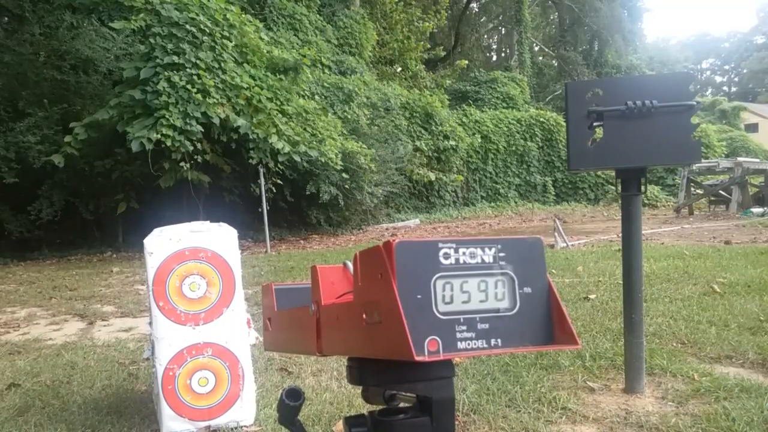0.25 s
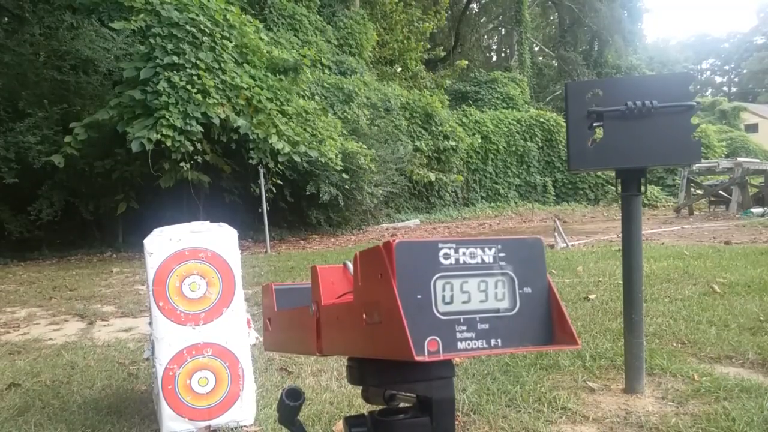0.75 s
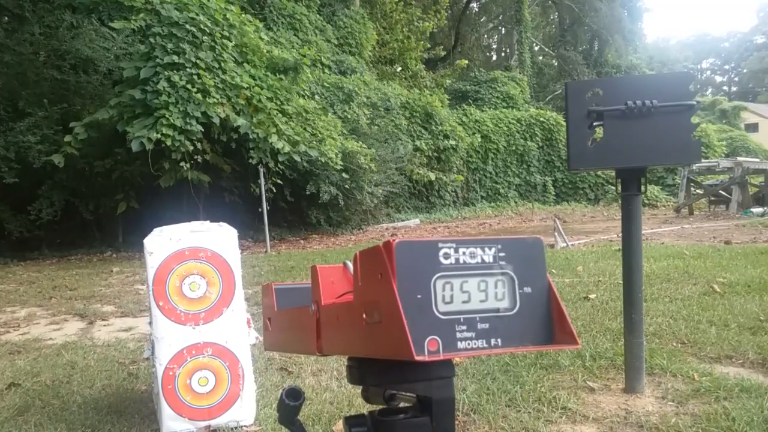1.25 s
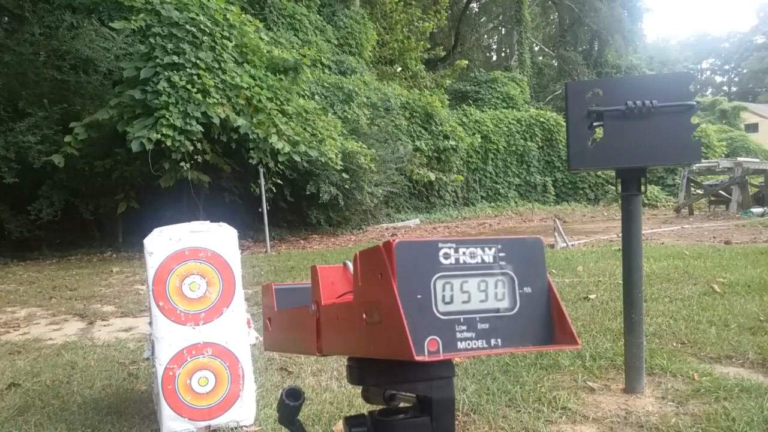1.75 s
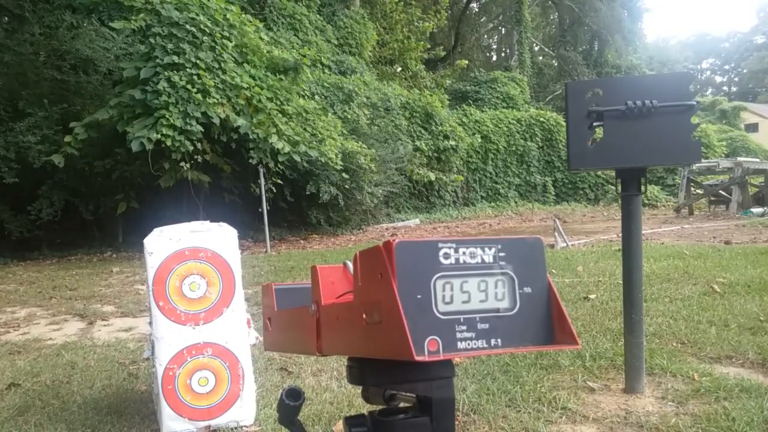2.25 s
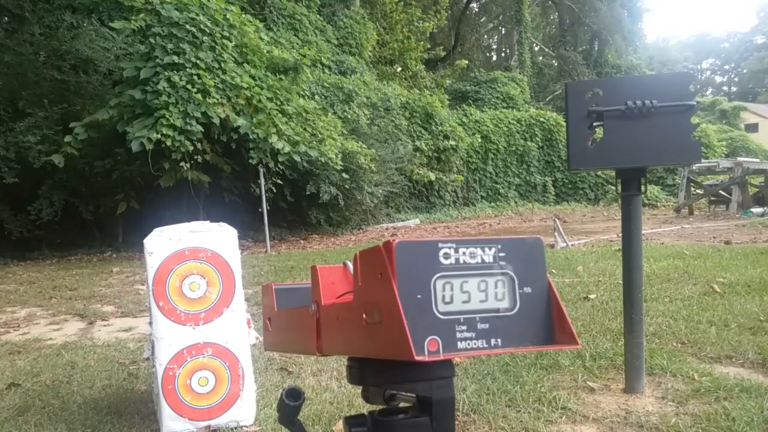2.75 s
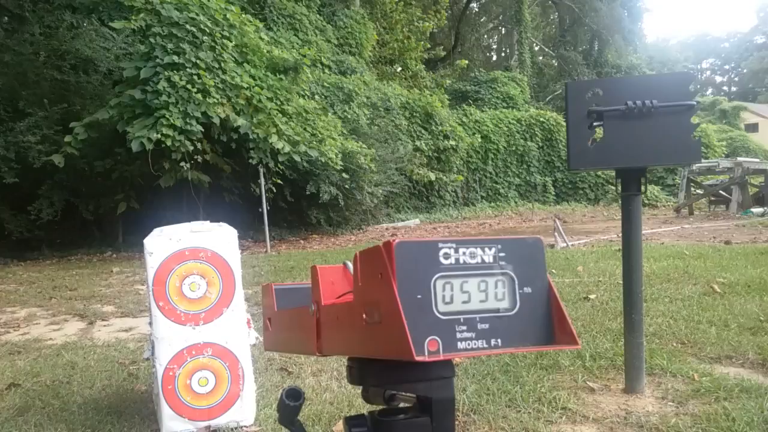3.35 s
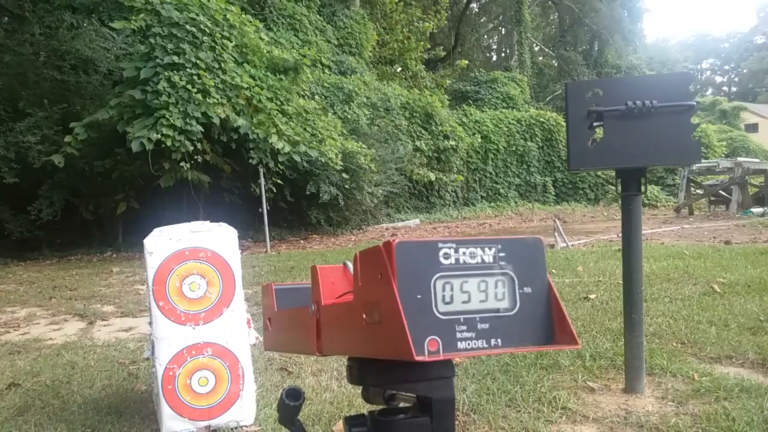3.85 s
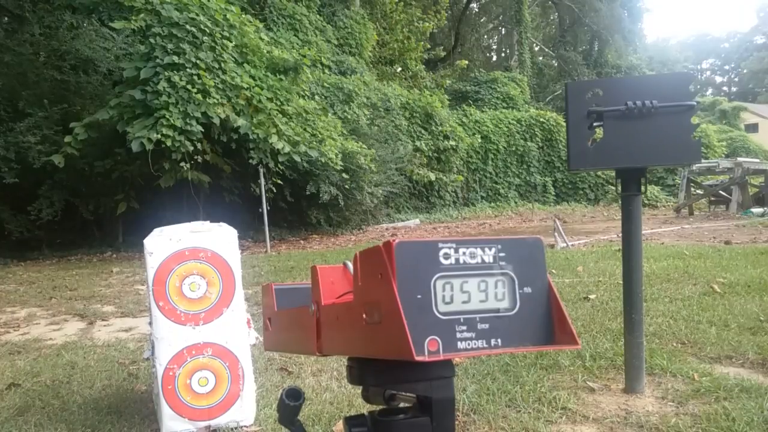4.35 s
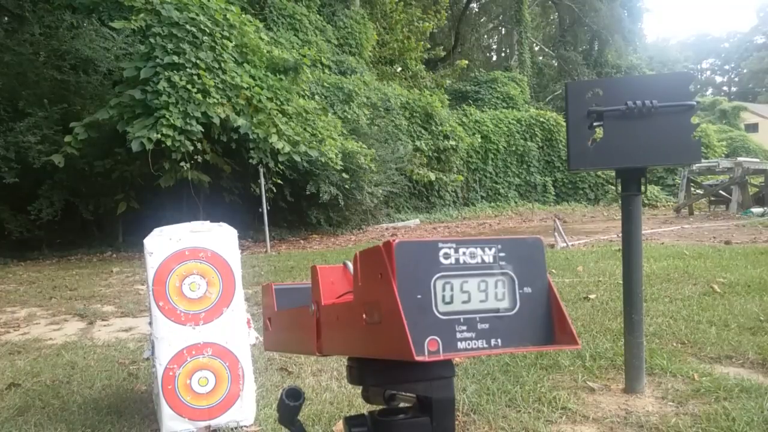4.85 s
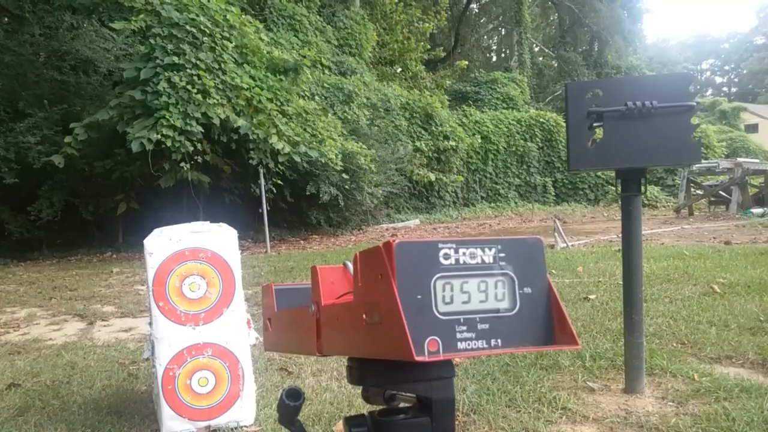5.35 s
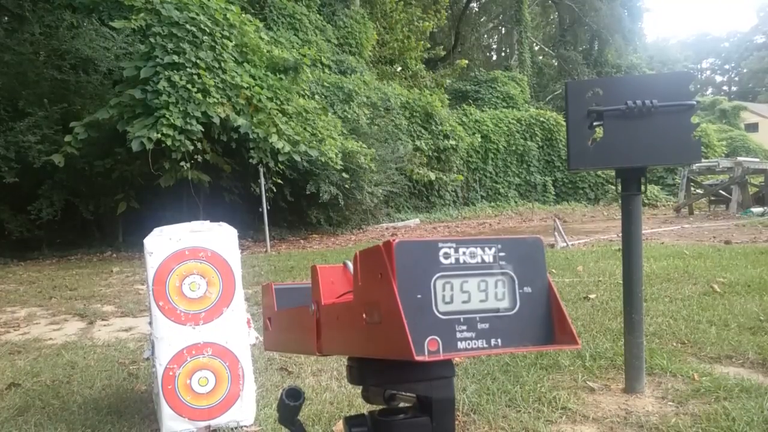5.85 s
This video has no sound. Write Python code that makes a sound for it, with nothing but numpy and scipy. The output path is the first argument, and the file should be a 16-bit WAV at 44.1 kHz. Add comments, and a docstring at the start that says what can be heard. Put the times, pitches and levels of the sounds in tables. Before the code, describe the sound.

Six loud, dry mechanical clacks about a second apart, each followed by small latch and stop clicks, with outdoor rumble and faint insect trill.

```python
"""An air pistol is pumped close by in a garden. The opening arm clicks faintly against its open stop; closing,
it rasps, judders in quick slips and slams shut, then its latch lets go and it opens again, over and over.
Each blow is a burst of tiny impacts ringing the pistol's modes; fences and trees echo it.
About halfway a far bird gives brief whistles, two slightly falling and two arched in pitch. Throughout: a motor
hum of wavering harmonics, distant traffic and leaves of swelling noise, a trilling insect of noise chirps."""
import sys
import numpy as np
from scipy import signal
from scipy.fft import rfft, irfft, next_fast_len
from scipy.io import wavfile
from scipy.ndimage import uniform_filter1d

SR = 44100
rng = np.random.default_rng(int(sys.argv[2]) if len(sys.argv) > 2 else 0)


def volts(x):
    """Linear amplitude factor 10**(x/20) for a level x in dB, scalar or array-like."""
    e = np.asarray(x, float) / 20
    return 10 ** e


def unload_wav(signal):
    """Save mono or channel-first audio to the path in sys.argv[1] as 16-bit WAV at rate SR, clipped to [-1, 1]."""
    wavfile.write(
        sys.argv[1],
        SR,
        np.round(np.clip(np.atleast_2d(signal).T, -1, 1) * 32767).astype(np.int16),
    )


N = 268562  # samples


def level(x, db):
    """Scale to an rms level."""
    return x * volts(db) / np.sqrt(np.mean(x ** 2))


def colour(x, table):
    """Filter by (hz, gain_db) points, interpolated over log frequency."""
    size = next_fast_len(len(x))
    hz, db = np.transpose(table)
    gain = volts(np.interp(np.log(np.fft.rfftfreq(size, 1 / SR) + 1), np.log(hz), db))
    return irfft(rfft(x, size) * gain, size)[:len(x)]


def band(x, hz, width_hz):
    """Second-order band-pass."""
    return signal.lfilter(*signal.iirpeak(hz, hz / width_hz, fs=SR), x)


def walk(rate_hz):
    """Random levels held 1 / rate_hz and slewed twice; spread near 1."""
    hold = int(SR / rate_hz)
    steps = np.repeat(rng.standard_normal(N // hold + 1), hold)
    return 1.3 * uniform_filter1d(uniform_filter1d(steps, hold), hold)[:N]


def add(out, time_s, sound):
    """Mix a sound in at a time."""
    i = int(time_s * SR)
    out[i:i + len(sound)] += sound[:N - i]


def pistol():
    """The pump arm closes in rasps, slips and slams, and opens in clicks."""
    return slams() + judders() + rasps() + opening()


# arm slams shut: time_s, contact_ms, level_db (2 to 5.5 kHz), body_db (400 Hz to 2 kHz), thump_db (under 400 Hz)
SLAM_BLOWS = [(.549, 1.8, -17.5, -17.5, -44.5), (0.5504, 3.1, -9, -13, -37), (1.4814, 3.8, -9.5, -12, -27),
              (2.5246, 4.2, -6.5, -8, -36.5), (3.4815, 4.47, -9, -10, -33.5), (4.461, 5, -9, -12.5, -30.5),
              (5.719, 4.5, -4.5, -8, -35.5)]


def slams():
    """Slams build up over their contact."""
    out = np.zeros(N)
    for time_s, contact_ms, level_db, body_db, thump_db in SLAM_BLOWS:
        band_db = (thump_db, body_db, level_db, level_db - 4)
        sound = blow(column=0, contact_ms=contact_ms, band_db=band_db,
                     rise=1.6, grain_depth=5.5, scatter_db=1.2, detune=0.006)
        add(out, time_s, sound)
    return out


# closing arm sticks and slips: bite_s, bite_db, run_end_ms (after the bite), run_db, slip_gap_ms
JUDDER_RUNS = [(0.49, -21, 0, -20, 5), (0.5028, -23, 39, -18.5, 5.6), (1.443, -21.5, 29.5, -22.5, 4.7),
               (2.487, -20, 31, -26, 4), (3.4476, -20.5, 32, -26.5, 5), (4.428, -20, 28, -27.5, 4.5),
               (5.6999, -16.5, 10, -32, 5)]
# slip spectrum: relative_db under 400 Hz, to 2 kHz, to 5.5 kHz, above
SLIP_BAND_DB = (-21, 0, -4, -8.5)
# change from slip to slip: step_db in the same four bands
SLIP_STEP_DB = np.array([-.6, -.6, -1.4, -1.6])


def judders():
    """The arm bites, pauses, then slips on in a quick fading run; each slip starts abruptly."""
    pause_ms, jitter_ms, scatter_db = 8.5, 0.5, 1.5
    out = np.zeros(N)
    for bite_s, bite_db, run_end_ms, run_db, slip_gap_ms in JUDDER_RUNS:
        k = np.arange(7)
        time_chance, level_chance = rng.standard_normal((2, 7))
        times_s = bite_s + (pause_ms + slip_gap_ms * k + jitter_ms * time_chance) / 1000
        run_levels = run_db + np.outer(k, SLIP_STEP_DB) + scatter_db * level_chance[:, None]
        bite_levels = bite_db + np.array([0, 0, -2, -2])  # duller than the first slip of the run
        for time_s, levels in zip((bite_s, *times_s), (bite_levels, *run_levels)):
            if time_s > bite_s + run_end_ms / 1000:
                continue
            slip = blow(column=1, contact_ms=1.4, band_db=levels + np.array(SLIP_BAND_DB),
                        rise=0.46, grain_depth=6.5, scatter_db=1.5, detune=0.023)
            add(out, time_s - 0.0005, slip)
    return out


# arm rasps along the tube: time_s, contact_ms, level_db, treble_db (added above 2 kHz)
RASP_DRAGS = [(.516, 31, -26, 3.5), (.678, 36, -48, -4), (1.445, 36, -24.5, 0.5), (1.646, 30, -48, -3),
              (2.489, 26.3, -19.5, -3), (2.72, 21, -55, 4), (3.449, 33, -33.5, 6), (3.69, 21, -48, 1),
              (4.43, 28, -29.5, 2.5), (4.651, 37, -49, -2), (5.701, 21, -29, 5), (5.99, 34, -51.5, -6.5)]
# rasp spectrum: relative_db under 400 Hz, to 2 kHz, to 5.5 kHz, above
RASP_BAND_DB = (-31.5, 0, -7.5, -16.5)


def rasps():
    """The arm drags along the tube: long, rough contacts."""
    out = np.zeros(N)
    for time_s, contact_ms, level_db, treble_db in RASP_DRAGS:
        band_db = level_db + np.array(RASP_BAND_DB) + treble_db * np.array([0, 0, 1, 1])
        sound = blow(column=1, contact_ms=contact_ms, band_db=band_db,
                     rise=0.46, grain_depth=9, scatter_db=3.5, detune=0.017)
        add(out, time_s, sound)
    return out


# pivot, piston and grip: time_s, level_db (2 to 5.5 kHz), contact_ms, hardness_db, favoured_hz
SMALL_CLICKS = [(.027, -49, 3.9, 6, 3320), (.205, -36, 3.3, -3, 3600), (.227, -51, 1.7, 6, 2600),
                (.681, -42, 4, -4.5, 3630), (.935, -45, 2.4, 9, 4090), (1.017, -51, 2.9, -12, 1320),
                (1.061, -46, 1.4, 3, 3500), (1.193, -64, 3.5, -16, 1520), (1.939, -43, 1.1, 12, 3490),
                (2.002, -37, 4.1, 0.5, 3900), (2.075, -50.5, 2.4, 0, 4020), (2.742, -49, 4.8, -8, 1370),
                (2.982, -52, 2.3, 18, 2930), (3.064, -37, 5, 2, 2680), (3.316, -46.5, 1.7, 2.5, 3420),
                (3.7, -47, 6.8, -1, 1440), (3.86, -48.5, 4.8, -3, 2710), (3.931, -46, 5.6, 12.5, 4280),
                (4.02, -43.5, 2.8, 0.5, 2880), (4.678, -51, 4.7, -9, 1723), (4.787, -54, 5.9, 2, 2020),
                (4.846, -52, 5.1, -5, 2690), (5.012, -42.5, 1.2, -1.5, 3560), (5.256, -51.5, 2.6, -2, 3620),
                (6.02, -42.5, 7.2, -6, 2020), (6.025, -33, 5.8, 14, 5330), (6.076, -27, 1.7, 1, 3760)]


def opening():
    """Latch and stop click in set patterns; pivot, piston and grip click as well."""
    out = np.zeros(N)
    for row in list(SMALL_CLICKS) + latches() + stops():
        start_s, sound = click(*row)
        if start_s < N / SR:
            add(out, start_s, sound)
    return out


# latch lets go: time_s, contact_ms, knock_db, snap_lag_ms, snap_db
LATCH_RELEASES = [(.729, 7.2, -30, 5, -21), (1.706, 3.6, -31.5, 6, -29), (2.77, 1.97, -30, 4.5, -25.5),
                  (3.726, 4.3, -32, 3.5, -30), (4.705, 3.5, -31, 7, -28.5), (6.046, 2.3, -31, 7, -32.5)]


def latches():
    """Click rows: the latch knocks, snaps and bounces once; two stray ticks follow as the arm swings."""
    rows = []
    for time_s, contact_ms, knock_db, snap_lag_ms, snap_db in LATCH_RELEASES:
        snap_s = time_s + snap_lag_ms / 1000
        rows.append((time_s, knock_db, contact_ms, -6, 1154))
        rows.append((snap_s, snap_db, 4.3, 2.12, 2080))
        rows.append((snap_s + 0.034, knock_db - 18, 4, -8, 1396))
        for delay, loudness in rng.random((2, 2)):
            rows.append((time_s + 0.45 * delay, -63 + 6 * loudness, 4, -3, 2700))
    return rows


# arm meets its open stop: time_s, contact_ms, level_db, take_up_lead_ms
STOP_HITS = [(.084, 1.7, -29, 22.6), (.894, 6.2, -35, 23), (1.884, 5.2, -37, 28), (2.934, 5, -30, 17),
             (3.88, 5.1, -30, 9), (4.871, 4, -31, 10.7)]


def stops():
    """Click rows: slack is taken up, the arm meets its open stop and bounces once."""
    rows = []
    for time_s, contact_ms, level_db, take_up_lead_ms in STOP_HITS:
        rows.append((time_s - take_up_lead_ms / 1000, level_db - 14, 3.2, -3.5, 2700))
        rows.append((time_s, level_db, contact_ms, 0, 2930))
        rows.append((time_s + 0.034, level_db - 23.5, 4, -8, 1396))
    return rows


def click(time_s, level_db, contact_ms, hardness_db, favoured_hz):
    """A small blow, with less body and more treble the harder it is; returns start_s and sound."""
    body_db = level_db - 4.5 - hardness_db
    treble_db = level_db - 12 + 0.54 * hardness_db
    sound = blow(column=2, contact_ms=contact_ms, band_db=(body_db - 14.5, body_db, level_db, treble_db),
                 rise=0.47, grain_depth=3.5, scatter_db=0, detune=0.054, favoured_hz=favoured_hz)
    return time_s - 0.0012, sound


# resonances of the pistol: pitch_hz, t60_ms
PISTOL_MODES = [(65, 70), (120, 50), (260, 30), (545, 22), (780, 9), (950, 12), (1080, 22), (1300, 12),
                (1510, 20), (1660, 12), (1950, 9), (2280, 70), (2380, 13), (2980, 10), (3335, 50),
                (3350, 8), (3750, 7), (4170, 9), (4600, 7), (5250, 6), (6150, 6), (7150, 5), (8250, 5),
                (9250, 5), (10600, 4), (12300, 3), (13800, 3), (15000, 3)]
# relative strength of each mode: slam_db, slip_db, click_db
MODE_ANSWER = [(-9, -14, -10), (1, -9, -8.5), (3, 2.5, 9.5), (-4.5, -21, -13.5), (-10.5, -13, -14),
               (-3, -11, -7), (-26.5, -2.5, -9), (-8, -6.5, -7.5), (-4, 0.5, -4), (-3, 1, -6), (-9, -7, -5),
               (-20, -22, -19), (-10, -9, 0), (-8, -11, -2), (-12, -20, -14), (-5, -10, -3), (-6, -10, -4),
               (0, -9, -6), (-5, -11, -8), (-9, -11, -9), (-14, -11.5, -7), (-12, -14, -13.5),
               (-13, -17, -9.5), (-11.5, -12, -18), (-14.5, -20, -17.5), (-7, -9, -10.5), (-9, -18.5, -15),
               (-8.5, -16.5, -10)]
# edges between the four level bands: edge_hz
BAND_EDGES = [400, 2000, 5500]


def blow(column, contact_ms, band_db, rise, grain_depth, scatter_db, detune, favoured_hz=0):
    """A burst of tiny impacts rings every mode, each a little differently from blow to blow."""
    modes = np.array(PISTOL_MODES)
    mode_hz, t60_ms = modes[:, 0], modes[:, 1:]
    t = np.arange(SR // 10) / SR
    u = t[:SR // 20] / (contact_ms / 1000)
    pitch_chance, level_chance = rng.standard_normal((2, len(modes)))
    grains = rng.standard_normal((1 + len(modes), len(u)))
    pressure = u ** rise * np.exp(-(1.404 * u) ** 2)
    roughness = volts(grain_depth * uniform_filter1d(grains[0], 9))
    # impacts wander over the parts, so each mode feels them with other signs
    push = pressure * roughness * grains[1:]
    rung_hz = mode_hz * (1 + detune * pitch_chance)
    decays = np.sin(2 * np.pi * rung_hz[:, None] * t) * volts(-60000 * t / t60_ms)
    rings = signal.fftconvolve(push, decays, axes=1)[:, :len(t)]
    for ring, f in zip(rings, mode_hz):  # a mode radiates little far from its pitch
        ring[:] = band(band(ring, f, f), f, f)
    # the spot struck favours modes near one pitch
    spot_db = 8 * np.exp(-(np.log(mode_hz / (favoured_hz + 1)) / 0.12) ** 2)
    mode_db = np.array(MODE_ANSWER)[:, column] + spot_db + scatter_db * level_chance
    rings *= (volts(mode_db) / np.abs(rings).max(axis=1))[:, None]
    sound = np.zeros(len(t))
    group = np.searchsorted(BAND_EDGES, mode_hz)
    for k, db in enumerate(band_db):
        part = rings[group == k].sum(axis=0)
        loudest = 2 * uniform_filter1d(part ** 2, 110).max()  # squared amplitude over 2.5 ms
        sound += volts(db) * part / np.sqrt(loudest)
    return sound


# distinct echoes: delay_s, gain_db
YARD_ECHOES = [(0.0684, -29.5), (.0865, -41), (.182, -47.5)]
# tone of the echoes: pitch_hz, gain_db
ECHO_TONE = [(300, -8), (1500, -6.5), (3000, 0.5), (16000, -4.5)]
# foliage wash, near then far: start_s, t60_s, gain_db
FOLIAGE = [(.0035, 0.103, -46.5), (0.017, 0.498, -58)]
# tone of the near wash: pitch_hz, relative_db
NEAR_TONE = [(300, -11.5), (600, -7.5), (1200, -8), (2300, 3), (3300, 2), (4400, 3.5), (6500, -7.5),
             (10000, -21), (16000, -17.5)]
# tone of the far wash: pitch_hz, relative_db
FAR_TONE = [(300, -18), (1200, -11), (2300, -8), (3400, -9), (4000, -6), (4300, 2.5), (4700, -5),
            (5400, -11), (6500, -20), (16000, -24)]


def yard(near):
    """Flat surfaces return distinct echoes; leaves return a noisy wash that follows the power they receive."""
    t = np.arange(SR // 2) / SR
    taps = np.zeros(len(t))
    for delay_s, gain_db in YARD_ECHOES:
        taps[int(delay_s * SR)] = volts(gain_db)
    out = colour(signal.fftconvolve(near, taps)[:N], ECHO_TONE)
    for (start_s, t60_s, gain_db), tone in zip(FOLIAGE, (NEAR_TONE, FAR_TONE)):
        decay = (t > start_s) * volts(gain_db - 60 * t / t60_s)
        power = signal.fftconvolve(near ** 2, decay ** 2)[:N]
        noise = level(colour(rng.standard_normal(N), tone), 0)
        out += np.sqrt(np.abs(power)) * noise * volts(1.5 * walk(160))
    return out


# far bird: start_s, length_s, start_hz, middle_hz, end_hz, level_db
BIRD_NOTES = [(3.171, 0.016, 2350, 2350, 2300, -68), (3.196, 0.015, 3150, 3140, 3100, -68),
              (3.249, 0.048, 3200, 3360, 3160, -60.5), (3.338, 0.023, 3600, 3700, 3550, -72)]


def bird():
    """Brief thin whistles: two fall slightly, two arch in pitch."""
    out = np.zeros(N)
    for start_s, length_s, start_hz, middle_hz, end_hz, level_db in BIRD_NOTES:
        u = np.linspace(0, 1, int(length_s * SR))
        pitch_hz = np.interp(u, (0, 0.5, 1), (start_hz, middle_hz, end_hz))
        whistle = np.sin(2 * np.pi * np.cumsum(pitch_hz) / SR)
        add(out, start_s, volts(level_db) * whistle * np.sin(np.pi * u) ** 0.35)
    return out


# swell of traffic, leaves and hum: time_s, gain_db
SWELL = [(0, -53), (.3, -55), (.75, -53), (1.2, -58), (1.63, -54), (2.1, -58.5), (2.61, -53), (3.09, -61),
         (3.31, -59.5), (3.68, -55), (4.02, -60), (4.36, -59.5), (4.63, -55.5), (4.94, -60.5),
         (5.19, -61.5), (5.7, -52), (5.94, -54), (6.09, -56)]
# swell of the insect: time_s, gain_db
INSECT_SWELL = [(0, -68.5), (.75, -69.5), (1.101, -68), (1.34, -69.5), (2.61, -69.5), (3.09, -73),
                (4.02, -71.5), (5.1, -71.5), (5.53, -68), (5.75, -68), (6.09, -72)]
# spectrum of traffic and leaves: pitch_hz, relative_db_per_hz
AIR_SPECTRUM = [(15, -62.5), (25, -29.5), (108, -6), (146, -10.5), (177, -6), (259, -14), (349, -11.5),
                (483, -19.5), (1150, -16), (2820, -29), (3410, -26), (6210, -38.5), (9080, -36.5),
                (15200, -43.5), (16500, -51.5)]


def garden():
    """Traffic and leaves are flickering noise under one swell with the hum; the insect has its own."""
    t = np.arange(N) / SR
    swell_db = np.interp(t, *np.transpose(SWELL))
    insect_db = np.interp(t, *np.transpose(INSECT_SWELL))
    air = colour(rng.standard_normal(N), AIR_SPECTRUM)
    rumble = signal.sosfiltfilt(signal.butter(2, 500, fs=SR, output="sos"), air)
    low = level(rumble, -3.1) * volts(walk(8.2)) + level(hum(), -1.1)
    middle = level(air - rumble, 2.9) * volts(2.2 * walk(29))
    out = volts(swell_db) * low + volts(swell_db - 7.5) * middle
    return out + volts(insect_db) * level(insect(), -1.5)


def insect():
    """Noisy chirps at the wing rate over a blur of further insects, ringing in two resonances."""
    trill_hz, blur, sharpness = 52.8, 0.42, 2.5
    phase = np.cumsum(trill_hz * (1 + 0.018 * walk(13))) / SR
    pulses = np.exp(sharpness * (np.cos(2 * np.pi * phase) - 1))
    chirps = blur + volts(2.5 * walk(27) + 2.2 * walk(3)) * pulses
    buzz = chirps * rng.standard_normal(N)
    out = np.zeros(N)
    for pitch_hz, width_hz, relative_db in ((8900, 650, 0), (7950, 500, -10)):
        ring = band(band(buzz, pitch_hz, width_hz), pitch_hz, width_hz)
        out += volts(relative_db) * level(ring, 0)
    return out


# motor harmonics: multiple, relative_db
HUM_HARMONICS = [(1, -11.5), (2, -9), (3, 1), (4, -3.5), (5, -8.5), (6, -2.5), (7, -15.5), (8, -19),
                 (9, -13.5), (10, -17)]


def hum():
    """A motor's harmonics at a steady speed, each wavering in level."""
    base_hz, waver_db = 58.45, 1.5
    phase = 2 * np.pi * base_hz * np.arange(N) / SR
    out = np.zeros(N)
    for multiple, relative_db in HUM_HARMONICS:
        tone = np.sin(multiple * phase + rng.uniform(0, 2 * np.pi))
        out += volts(relative_db + waver_db * walk(6)) * tone
    return out


# channel difference: pitch_hz, gain_db (against the middle)
SIDE_TONE = [(30, -33), (125, -36), (2000, -39.5), (4000, -34.5), (8000, -27), (16000, -26)]


def scene():
    """Everything reaches one microphone; the channels differ by a faint smeared copy."""
    near = pistol() + bird()
    mono = near + yard(near) + garden()
    smear = rng.standard_normal(SR // 200)
    smeared = np.convolve(mono, smear / np.linalg.norm(smear), "same")
    side = colour(smeared, SIDE_TONE)
    return np.array([mono + side, mono - side])


def top_cut(x):
    """Nothing passes above the cut-off."""
    return signal.sosfilt(signal.butter(12, 16850, fs=SR, output="sos"), x)


def record(dry):
    """The microphone hisses and loses the deepest bass; the top is cut steeply, peaks clip at full scale."""
    hiss_db, top_hz, bass_hz = -76.5, 15900, 45
    mix = dry + volts(hiss_db) * rng.standard_normal(N)
    mix = signal.sosfilt(signal.cheby1(11, 0.5, top_hz, fs=SR, output="sos"), mix)
    mix = signal.sosfilt(signal.butter(2, bass_hz, "high", fs=SR, output="sos"), mix)
    return top_cut(np.clip(mix, -1, 1))


dry = scene()
out = record(dry)
unload_wav(out)
```